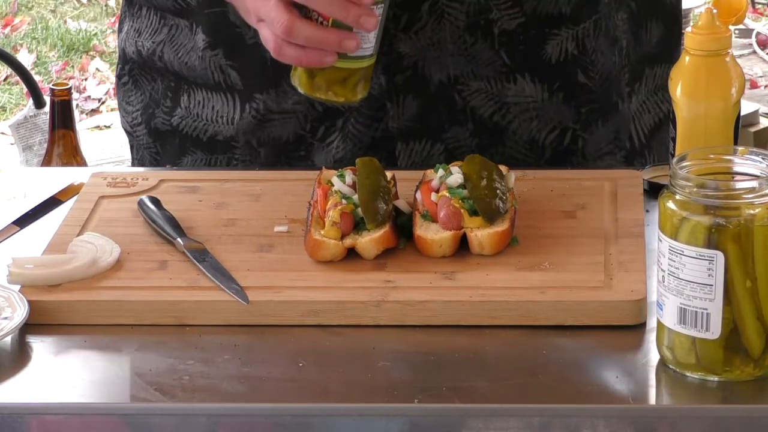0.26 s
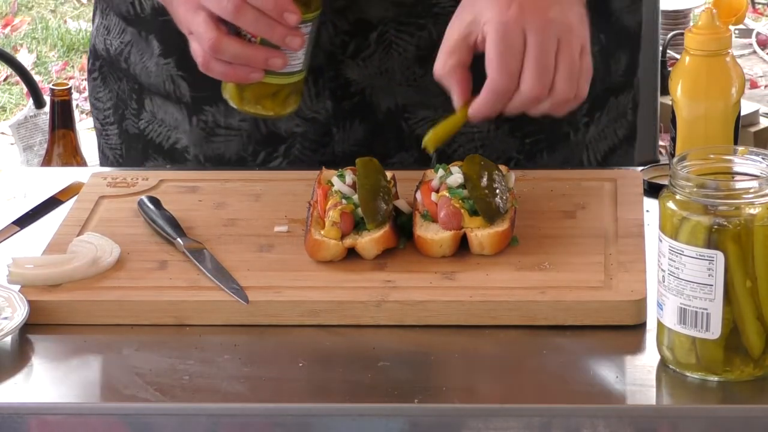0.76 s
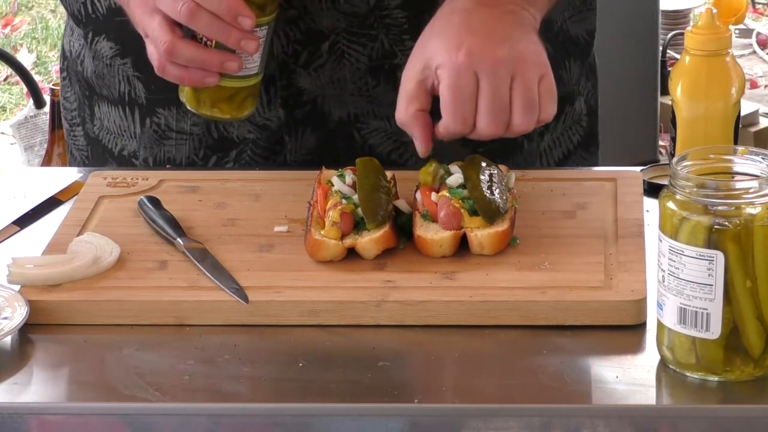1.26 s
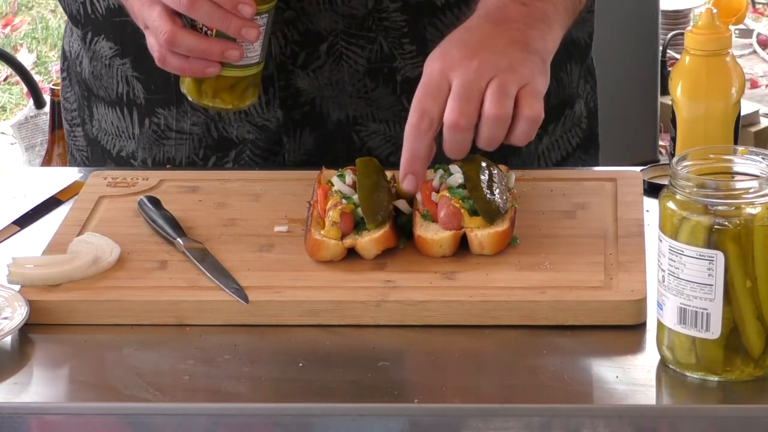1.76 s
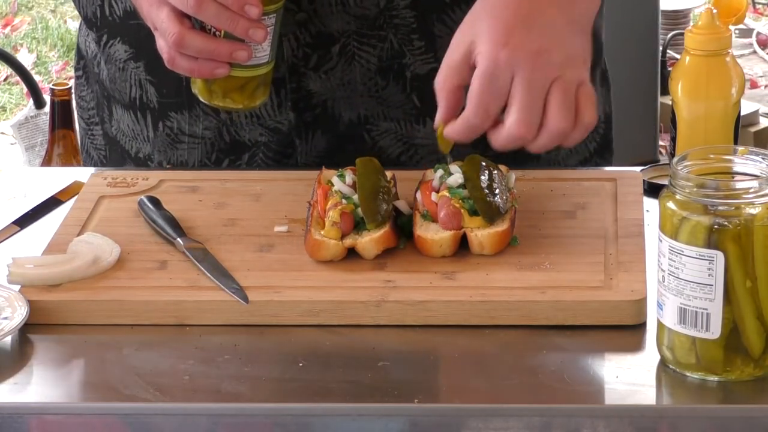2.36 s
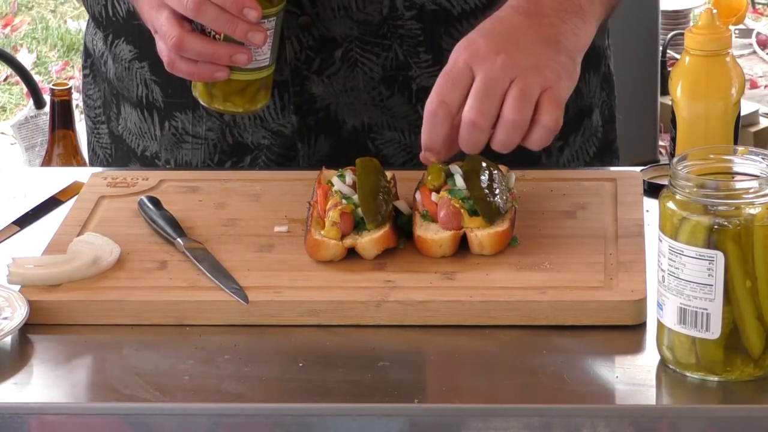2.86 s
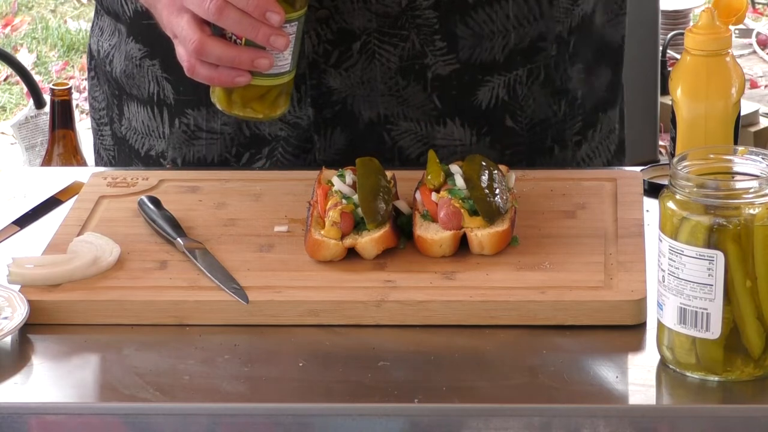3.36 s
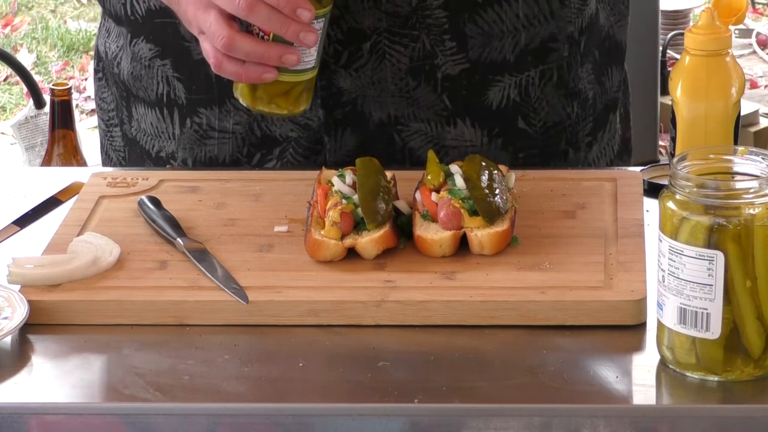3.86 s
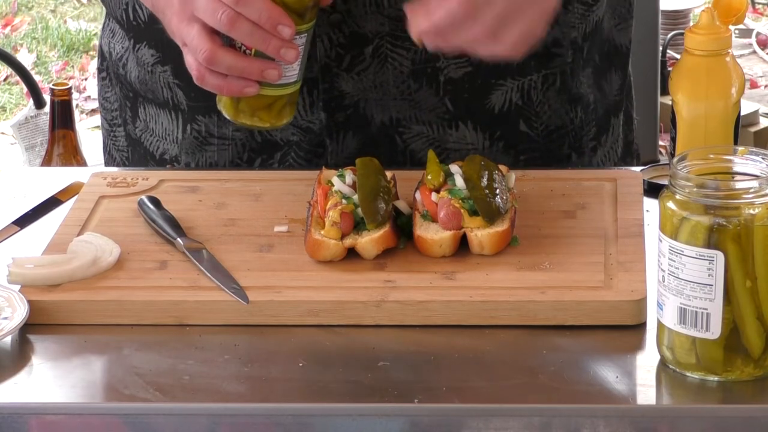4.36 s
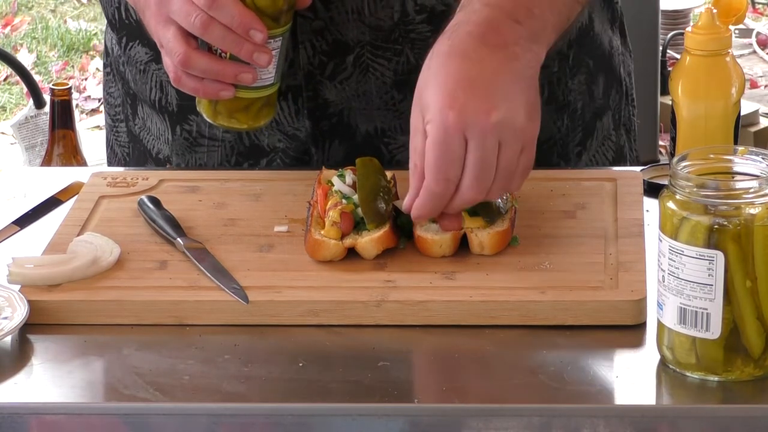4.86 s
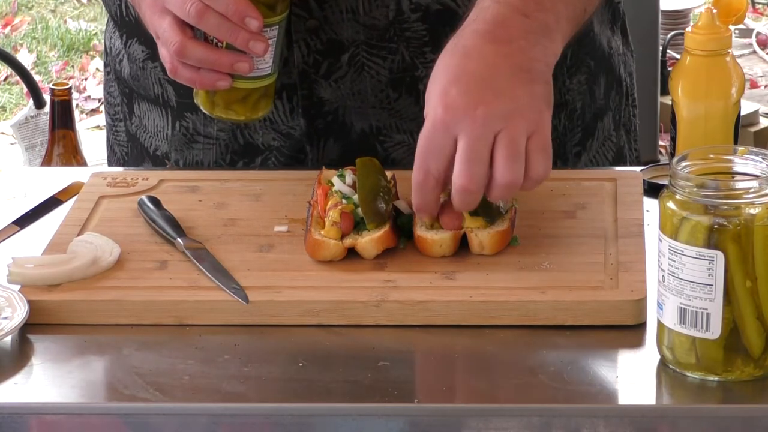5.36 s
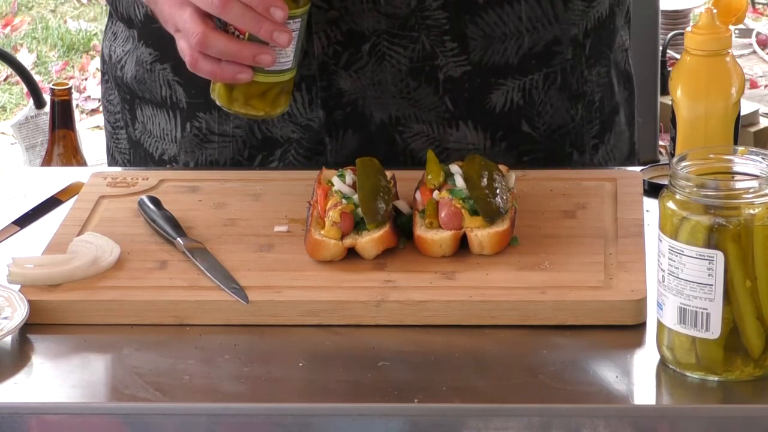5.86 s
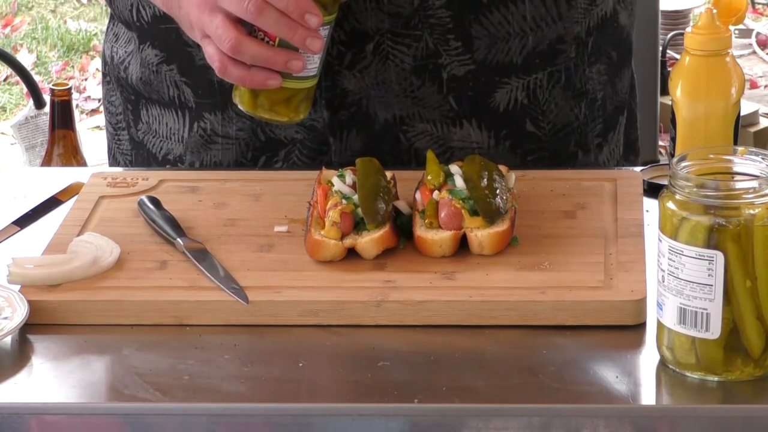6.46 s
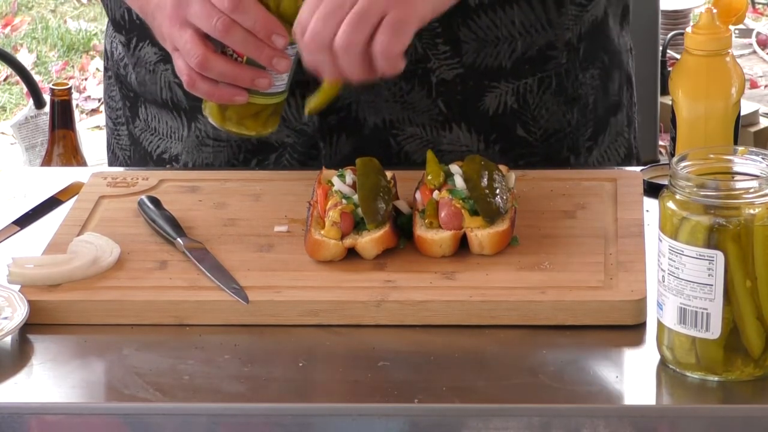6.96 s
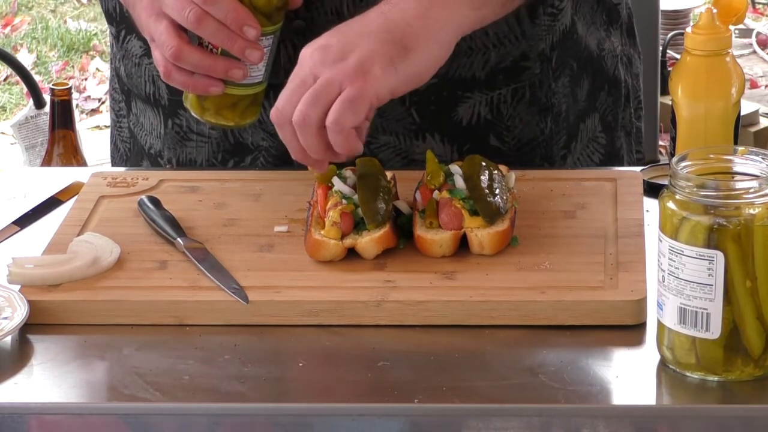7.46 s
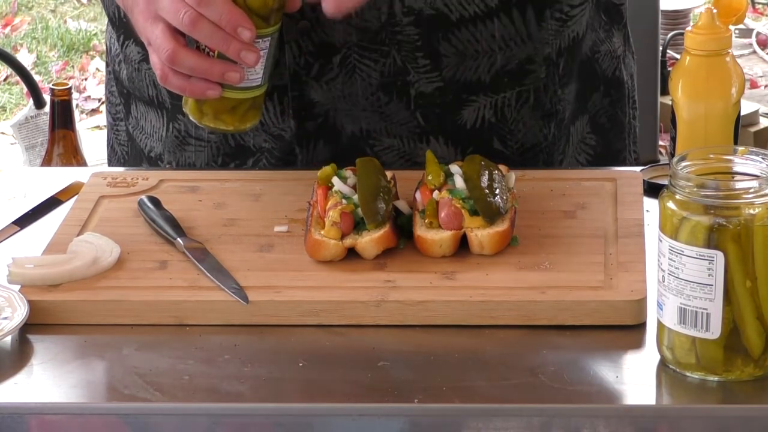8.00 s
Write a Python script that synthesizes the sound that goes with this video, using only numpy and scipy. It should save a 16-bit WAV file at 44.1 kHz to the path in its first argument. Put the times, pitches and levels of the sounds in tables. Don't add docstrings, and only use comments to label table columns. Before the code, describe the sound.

A low propeller drone around ninety hertz swells and fades outdoors, over faint hiss and insect rasps, with small glass taps and soft food brushes.

```python
import sys
import numpy as np
from scipy import signal
from scipy.io import wavfile
from scipy.ndimage import uniform_filter1d

SR = 44100
rng = np.random.default_rng(int(sys.argv[2]) if len(sys.argv) > 2 else 0)


def generate_wav(signal):
    frames = np.transpose(np.atleast_2d(signal))
    scaled = np.clip(frames, -1, 1) * 32767
    pcm = np.round(scaled).astype(np.int16)
    wavfile.write(sys.argv[1], SR, pcm)


def volts_from_db(level):
    exponent = np.asarray(level, float) / 20
    return 10 ** exponent


N = 363119
T = np.arange(N) / SR
EDGE_HZ = 15715


def evened(x):
    return x / np.sqrt(np.mean(x ** 2) + 1e-20)


def curve(rows, t, column=1):
    rows = np.array(rows)
    return np.interp(t, rows[:, 0], rows[:, column])


def read(points, hz):
    f, value = np.transpose(points)
    return np.interp(np.log(hz + 1), np.log(f + 1), value)


def add(mix, s, sound):
    part = mix[round(s * SR):][:len(sound)]
    part += sound[:len(part)]


def resonate(x, hz, width):
    turn = np.exp(2j * np.pi * hz * np.arange(len(x)) / SR)
    r = np.exp(-np.pi * width / SR)
    slow = signal.lfilter([1 - r], [1, -r], x / turn)
    return 2 * (turn * slow).real


def wander(top_hz):
    rates, starts = np.geomspace(top_hz / 8, top_hz, num=16), rng.random(16)
    coarse = T[::64]
    sines = np.sin(2 * np.pi * (rates * coarse[:, None] + starts))
    return np.interp(T, coarse, evened(sines.sum(axis=1)))


def noise(colour, band, patchy_db, size):
    frames, hz = 4 * N // size + 5, np.fft.rfftfreq(size, 1 / SR)
    a, b, patches = rng.standard_normal((frames, len(hz), 3)).T
    patches = uniform_filter1d(patches, size=12, axis=0)
    patches = evened(uniform_filter1d(patches, size=10, axis=1))
    gain = volts_from_db(read(colour, hz))
    spectra = (a + 1j * b) * gain[:, None] * volts_from_db(patchy_db * patches)
    x = signal.istft(spectra, nperseg=size, noverlap=3 * size // 4)[1]
    inside = (hz > band[0]) & (hz < band[1])
    share = np.sum(gain[inside] ** 2) / np.sum(gain ** 2)
    return evened(x[:N]) / np.sqrt(share)


def whistle(hz, width):
    coarse = T[::32]
    r = np.exp(-np.pi * width * 32 / SR)
    slow = signal.lfilter([1], [1, -2 * r, r * r], rng.standard_normal((len(coarse), 2)), axis=0)
    turn = 2 * np.pi * hz * T
    real, imaginary = np.interp(T, coarse, slow[:, 0]), np.interp(T, coarse, slow[:, 1])
    return evened(real * np.cos(turn) + imaginary * np.sin(turn))


# t/s, level/dB
FIRST_LEVEL = [(0.0, -34.5), (0.7, -31.5), (0.96, -26), (1.5, -26.5), (1.74, -22.5), (2.06, -23),
               (2.45, -27.5), (2.79, -21), (3.4, -22), (3.71, -17), (4.03, -21), (4.61, -11.5),
               (5.3, -28.5), (5.8, -16), (6.14, -12.5), (6.38, -20), (7.3, -26), (8.23, -20.5)]
# t/s, half width/s, depth/dB
EDDIES = [(.85, 0.036, -4.5), (1.95, 0.042, -2), (2.98, 0.041, -3), (3.47, 0.052, -4), (3.6, .05, -3.5),
          (3.89, 0.053, -7.5), (4.9, 0.11, -7.5), (5.02, 0.026, -15), (5.39, .05, -3.5), (7.45, 0.094, -5)]
# t/s, half width/s
NULLS = [(.49, 0.15), (4.22, 0.3), (5.12, 0.12), (7.16, 0.12)]


def first_tone():
    dimmed_db = sum(db * np.exp(-((T - s) / half) ** 2) for s, half, db in EDDIES)
    gain = volts_from_db(curve(FIRST_LEVEL, T) + dimmed_db)
    return gain * np.prod([np.tanh((T - s) / half) for s, half in NULLS], axis=0)


def swells(rows):
    valley_db, pointedness = -58, 1.43
    s, half, db = np.transpose(rows)
    coarse = T[::64, None]
    lobes = np.cos(np.pi / 2 * np.clip((coarse - s) / half, -1, 1)) ** 2
    gain = volts_from_db(valley_db) + (volts_from_db(db) * lobes ** (pointedness / 2)).sum(axis=1)
    return np.interp(T, coarse[:, 0], gain)


# t/s, f/Hz
BLADE_RATE = [(0.0, 93.74), (1.03, 93.95), (2.06, 93.13), (3.09, 91.23), (4.12, 91.97), (5.15, 90.97),
              (6.18, 88.9), (7.21, 88.9), (8.24, 88.24)]
# middle t/s, half length/s, top level/dB
SECOND_SWELLS = [(.11, 0.17, -41.5), (.39, 0.22, -40.5), (.76, 0.19, -49), (1.07, 0.19, -41.5),
                 (1.4, .25, -43.5), (1.75, 0.085, -62), (2.12, 0.11, -41.5), (2.33, .2, -51),
                 (2.87, 0.075, -48), (3.32, .27, -43.5), (3.66, 0.15, -40.5), (4.01, 0.17, -37),
                 (4.42, 0.2, -35.5), (4.67, 0.12, -36), (4.88, .14, -37), (5.36, 0.16, -36),
                 (5.56, 0.098, -42.5), (6.0, 0.31, -31), (6.57, 0.26, -33), (6.87, .06, -43),
                 (7.1, 0.12, -37), (7.5, 0.35, -39), (7.87, 0.067, -37), (8.17, 0.24, -31.5)]
# middle t/s, half length/s, top level/dB
THIRD_SWELLS = [(1.36, 0.1, -55), (2.04, 0.075, -48.5), (2.44, .15, -45.5), (2.72, 0.22, -43),
                (3.04, 0.099, -45.5), (3.36, 0.18, -47.5), (3.74, 0.11, -47), (3.97, 0.1, -42.5),
                (4.64, 0.12, -52), (4.89, 0.073, -53), (5.39, 0.071, -44.5), (5.59, 0.12, -42),
                (5.9, 0.15, -52), (6.2, 0.11, -41), (6.33, 0.056, -39), (6.48, 0.087, -41),
                (6.71, 0.13, -41), (7.6, .14, -42), (7.92, .13, -43), (8.2, 0.1, -44)]


def propeller():
    wobble_rad, flutter_db, fourth_db = .09, .5, -55
    turns = 2 * np.pi * np.cumsum(curve(BLADE_RATE, T)) / SR
    fourth = volts_from_db(fourth_db + curve(OPENING, T)) * wander(3.0)
    gains = [first_tone(), swells(SECOND_SWELLS), swells(THIRD_SWELLS), fourth]
    out = np.zeros(N)
    for k, gain in enumerate(gains, 1):
        gain = uniform_filter1d(uniform_filter1d(gain, size=1300), size=1300)
        tremble_db = (k - .5) * flutter_db * wander(14.0)
        phase = k * turns + (k ** 2.01 - .7) * wobble_rad * wander(8.0)
        out += gain * volts_from_db(tremble_db) * np.sqrt(2) * np.sin(phase)
    return out


# t/s, peak level/dB, low mode f/Hz, high mode f/Hz, t60/s
TAPS = [
    (0.324, -39, 2360, 2750, .014),
    (0.588, -38, 3120, 3870, .014),
    (2.903, -37, 2750, 3400, 0.021),
    (3.672, -31.5, 4330, 6560, 0.02),
    (4.2622, -32.5, 1560, 3420, 0.02),
    (4.9995, -37, 3000, 3630, 0.014),
]
# t/s,
# level/dB, centre f/Hz, width/Hz, length/s
BRUSHES = [(0.123, -49.5, 1600, 1800, .03), (0.572, -44, 640, 220, 0.15), (0.602, -49.5, 597, 400, 0.35),
           (2.255, -51, 900, 500, 0.067), (2.255, -40, 656, 300, 0.18), (2.246, -39, 348.6, 200, 0.14),
           (2.25, -50, 690, 800, 0.64), (7.6, -47.5, 700, 700, 0.61), (2.499, -44.5, 232.5, 25, 0.77),
           (2.546, -46.5, 450, 300, 0.38), (7.15, -48.5, 780, 600, 0.45), (3.252, -50.5, 6800, 1500, .045),
           (2.997, -48.5, 2500, 2500, 0.084), (5.777, -47, 3600, 2000, 0.035),
           (5.961, -43.5, 4350, 200, 0.043), (5.966, -42.5, 2070, 900, 0.062),
           (6.563, -47, 3200, 1200, .03), (6.64, -41, 3500, 2400, 0.048), (7.144, -53, 3500, 2500, .04),
           (7.68, -55, 2516, 2500, .06), (7.842, -40.5, 1090, 800, 0.1), (7.845, -40, 586, 400, 0.087),
           (7.849, -46, 2500, 2500, 0.08)]


def hands():
    out, t = np.zeros(N), T[:SR]
    for s, db, low_hz, high_hz, t60 in TAPS:
        ring = np.sin(2 * np.pi * low_hz * t) + 0.69 * np.sin(2 * np.pi * high_hz * t)
        crack = rng.standard_normal(len(t)) * np.exp(-t / 0.0046)
        crack = resonate(resonate(crack, 3000, 3500), 3000, 3500)
        attack = np.minimum(t / 0.00059, 1)
        add(out, s, volts_from_db(db) * attack * (volts_from_db(-60 * t / t60) * ring + crack))
    for s, db, hz, width, length in BRUSHES:
        grains = rng.standard_normal(len(t)) * (0.42 + (rng.random(len(t)) < .03))
        rub = resonate(resonate(grains, hz, width), hz, width)
        stroke = np.sin(np.pi * np.minimum(t / length, 1) ** .55)
        add(out, s, volts_from_db(db) * evened(rub) * stroke)
    return out


# t/s, peak level/dB, ring f/Hz
LOUD_RASPS = [(1.0755, -39, 11600), (1.983, -34, 10960), (2.24, -39, 11800), (2.5371, -36.5, 9520),
              (2.6494, -38, 12580), (2.7731, -36, 9600), (2.816, -35, 10200), (3.253, -34, 12700),
              (3.563, -38, 11300), (3.711, -37, 13960), (3.9095, -40, 10300), (4.555, -40, 10800),
              (4.9077, -41, 10300), (5.0494, -39, 11000), (5.1038, -39, 12100), (5.27, -37, 10800),
              (5.3148, -37, 10200), (5.3877, -38, 11200), (5.477, -36.5, 12600), (5.5243, -40, 12300),
              (5.6625, -37, 11400), (5.9778, -37, 12460), (6.2582, -41, 10630), (6.5605, -40, 12000),
              (6.5819, -40, 9060), (7.3927, -40, 12600), (7.5018, -37, 11500), (7.7503, -38, 11500),
              (7.9269, -38, 13900), (8.077, -38, 11400)]
# t/s, peak level/dB
FAINT_RASPS = [(.1521, -45), (.4105, -44), (.453, -43), (.6255, -44), (.6504, -41), (.708, -44), (.814, -41),
               (1.289, -44), (1.4782, -43), (1.5658, -41), (1.7095, -42), (1.829, -42), (2.0413, -44),
               (2.133, -45), (2.2653, -43), (2.4396, -39), (2.878, -43), (3.059, -42), (3.5024, -41),
               (3.777, -42), (3.866, -43), (4.0512, -46), (4.149, -43), (4.7566, -41), (4.8723, -46),
               (5.7473, -44), (6.4687, -44), (7.6507, -45), (7.6705, -43), (8.0516, -41)]
# f/Hz, level/dB
RASP_COLOUR = [(4000, -30), (6500, -9), (8200, -7), (10000, -3), (12500, -.5), (14300, -5), (16000, -12)]


def rasps():
    faint_ring_hz = 12000
    scrape = noise(RASP_COLOUR, (8000, 15500), patchy_db=1.0, size=256)
    out, t = np.zeros(N), T[:SR // 8]
    rows = LOUD_RASPS + [(s, db, faint_ring_hz) for s, db in FAINT_RASPS]
    spread = rng.uniform(.75, 1.15, (len(rows), 2))
    for (s, db, hz), others in zip(rows, spread):
        length = 0.028 + .0006 * (db + 43)
        piece = scrape[round(s * SR):][:len(t)]
        shape = np.minimum(t / 0.001, 1) * np.exp(-(t / length) ** 1.5)
        shape = shape[:len(piece)]
        rings = sum(evened(resonate(piece, min(hz * k, EDGE_HZ), 60)) for k in (1, *others))
        add(out, s, volts_from_db(db - 16.0) * shape * (piece + 0.22 * rings))
    return out


# t/s, f/Hz, level/dB
SQUEAK = [
    (7.28, 13400, -80),
    (7.3, 13550, -69),
    (7.34, 14000, -68),
    (7.39, 13900, -68),
    (7.43, 13500, -78),
]


def squeak():
    on = (T > SQUEAK[0][0]) & (T < SQUEAK[-1][0])
    turns = np.cumsum(curve(SQUEAK, T) + 60 * wander(60.0)) / SR
    level_db = curve(SQUEAK, T, column=2) + 3.0 * wander(40.0)
    return on * volts_from_db(level_db) * np.sin(2 * np.pi * turns)


# t/s, level/dB
OPENING = [(0.0, -4), (0.48, -6.5), (0.95, -6), (2.25, -2.5), (3.25, 0.3), (5.5, -0.17), (7.6, 1),
           (8.23, 0.8)]
# f/Hz, level/dB
ROAR = [(90, -42), (150, -1), (240, -1.5), (300, -5), (370, -4), (520, -8), (800, -12), (1150, -12.5),
        (1400, -19.5), (2500, -52)]
# f/Hz, level/dB
RUMBLE = [(15, -28), (25, -1), (36, -3.5), (50, 2.5), (75, -5.5), (90, 9.5), (108, -0.5), (135, -5.5),
          (170, -10.5), (300, -72)]
# f/Hz, width/Hz, level/dB
MOTOR = [
    (100, 1.2, -46),
    (69.5, 7.4, -49),
]
# f/Hz, level/dB
HISS = [(300, -12), (900, 1), (1700, -1), (3300, -0.5), (4000, -6), (5000, -7), (6000, -9), (7500, -11),
        (9000, -15.5), (11500, -15), (14500, -17.5), (15800, -18)]
CRICKET_HZ = [1130, 2750, 4310, 4490, 4545, 4630, 5140, 5190, 5243, 5440, 6343, 6860, 7450, 7760, 8350,
              10050, 10320, 15300, 15680]
# width/Hz, level over the hiss/dB
CRICKETS = [(40, -17), (40, -14), (45, -24), (40, -17), (30, -21), (40, -17.5), (60, -17), (35, -17.5),
            (40, -13.5), (45, -21.5), (40, -17), (90, -23), (60, -27), (160, -23), (250, -25), (150, -27),
            (120, -25), (130, -30), (140, -27)]


def garden():
    near_db = curve(OPENING, T)
    roar = volts_from_db(-44 + 1.18 * near_db) * noise(ROAR, (300, 1300), patchy_db=.9, size=4096)
    rumble = volts_from_db(-44.5 + 1.2 * near_db) * noise(RUMBLE, (25, 62), patchy_db=3.0, size=8192)
    motor = sum(volts_from_db(db) * (whistle(hz, width) + np.sin(2 * np.pi * hz * T)) for hz, width, db in MOTOR)
    hiss = noise(HISS, (1500, 4000), patchy_db=1.17, size=1024)
    crickets = sum(volts_from_db(db) * whistle(hz, width) for hz, (width, db) in zip(CRICKET_HZ, CRICKETS))
    return roar + rumble + motor + volts_from_db(-49.5 + 0.83 * near_db) * (hiss + crickets)


def scene():
    return (propeller() + hands() + rasps() + squeak() + garden())[None]


def low_pass(x):
    return signal.sosfilt(signal.butter(12, 15890, fs=SR, output="sos"), x)


def record(dry):
    lowpass = signal.firwin(1023, EDGE_HZ, window=("kaiser", 9), fs=SR)
    limited = signal.oaconvolve(dry, lowpass[None], "same")
    return low_pass(limited)


dry = scene()
out = record(dry)
generate_wav(out)
```